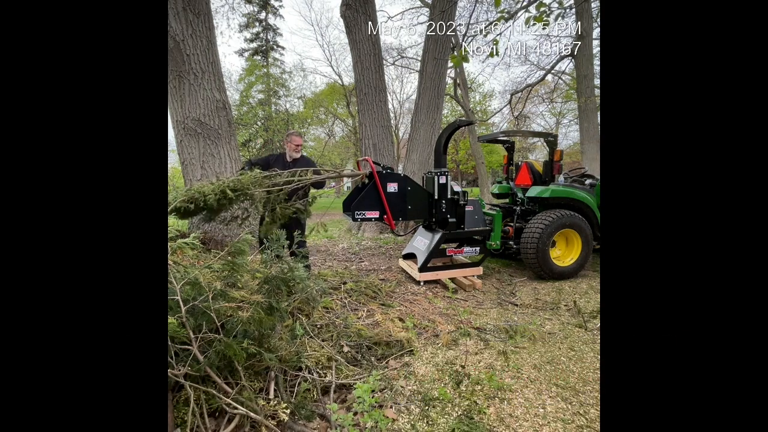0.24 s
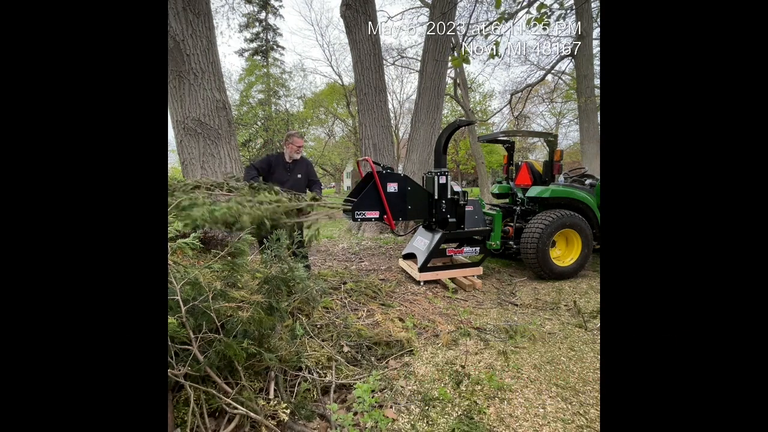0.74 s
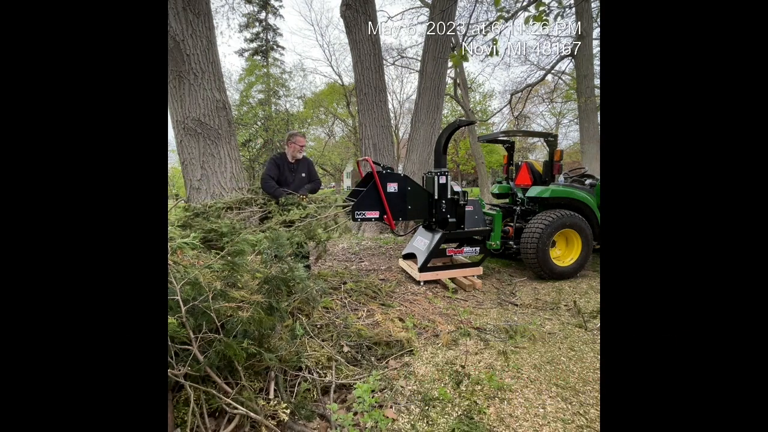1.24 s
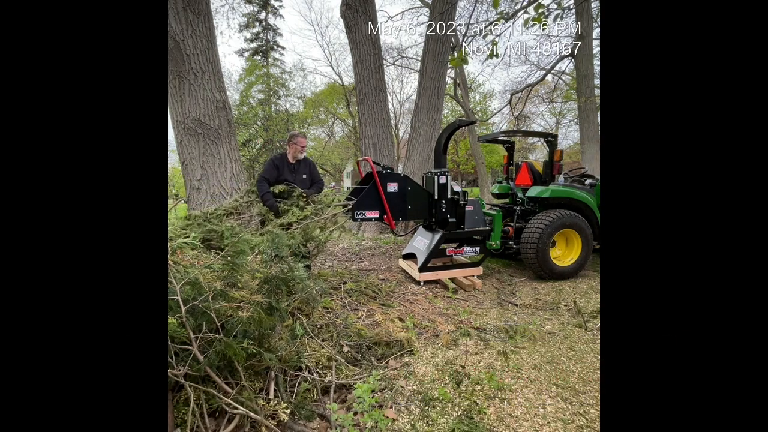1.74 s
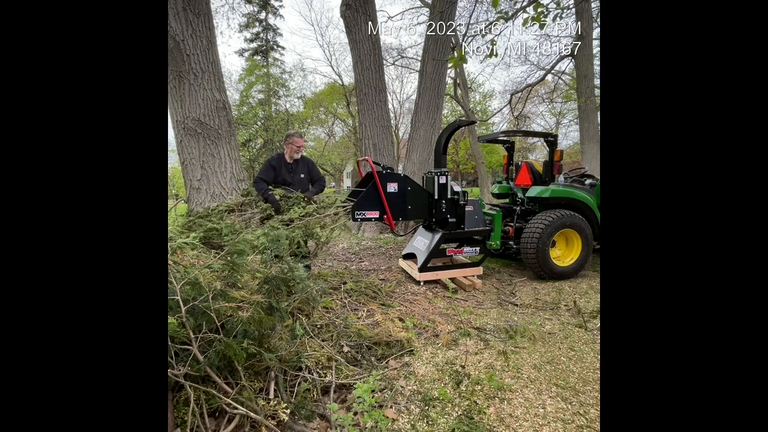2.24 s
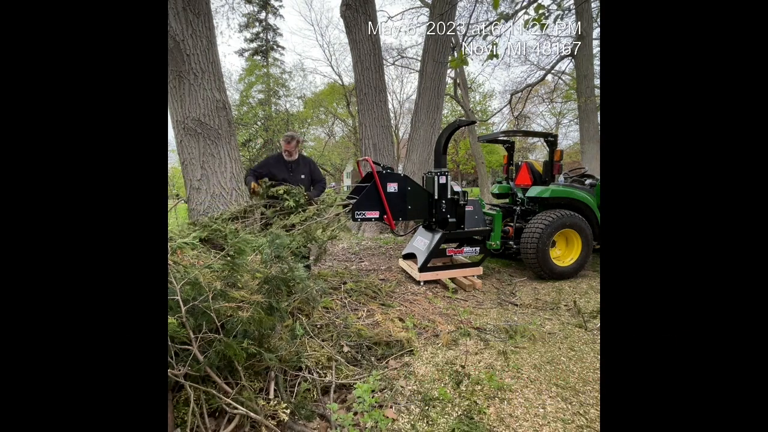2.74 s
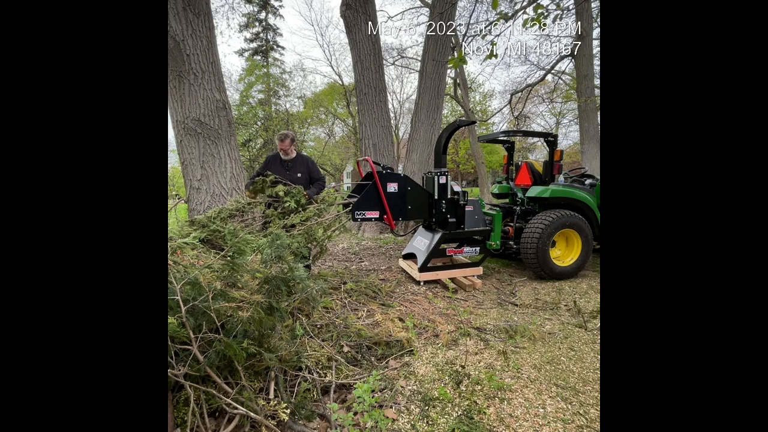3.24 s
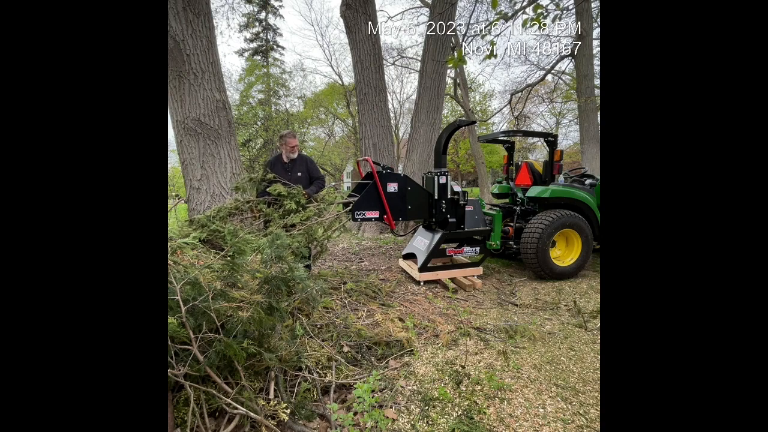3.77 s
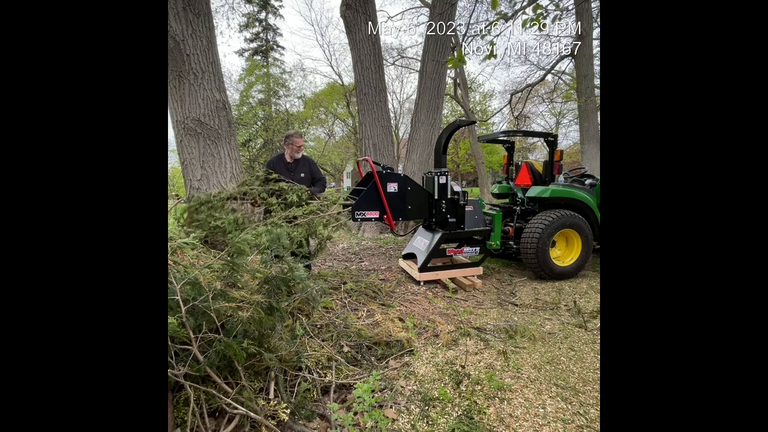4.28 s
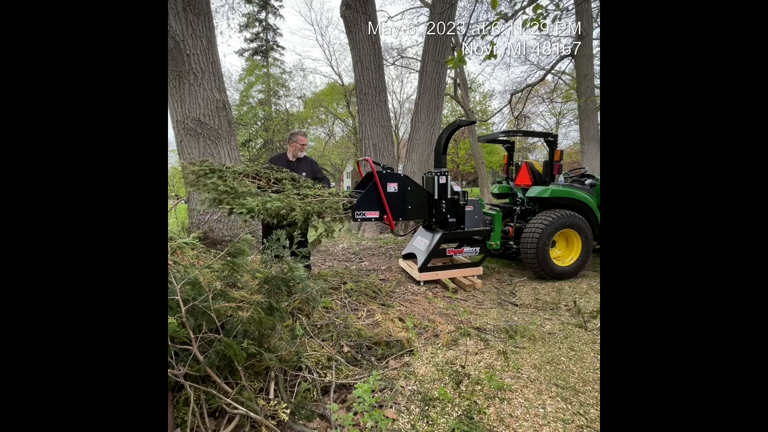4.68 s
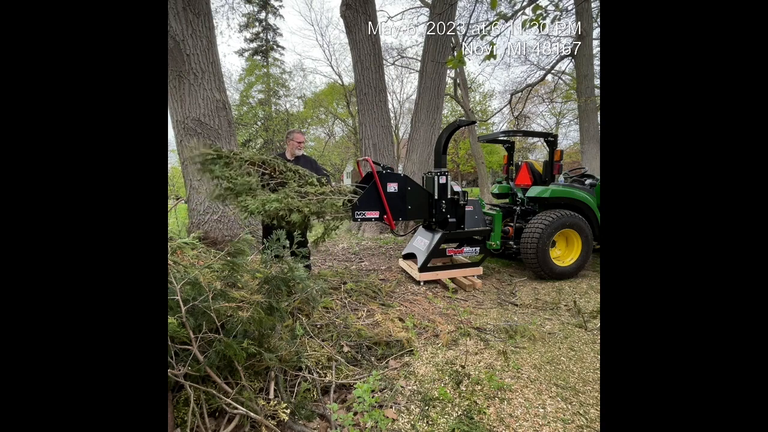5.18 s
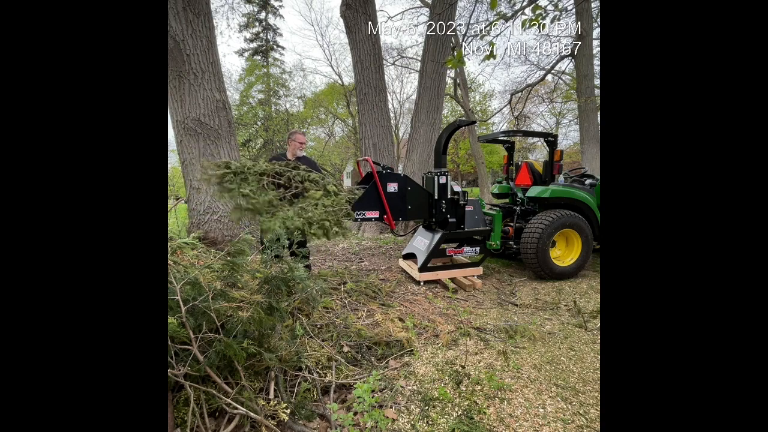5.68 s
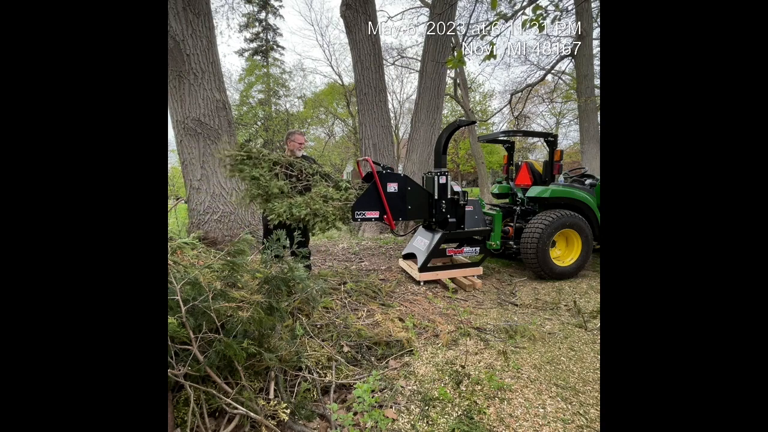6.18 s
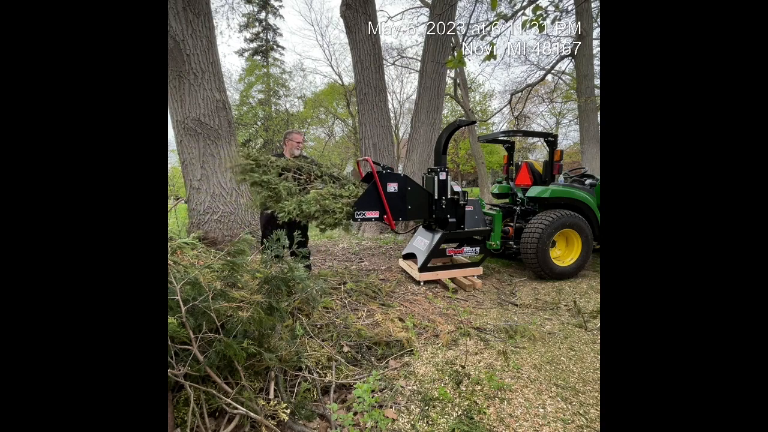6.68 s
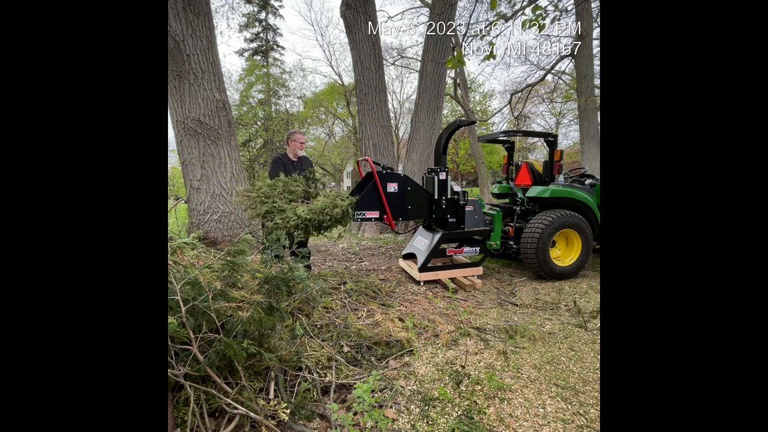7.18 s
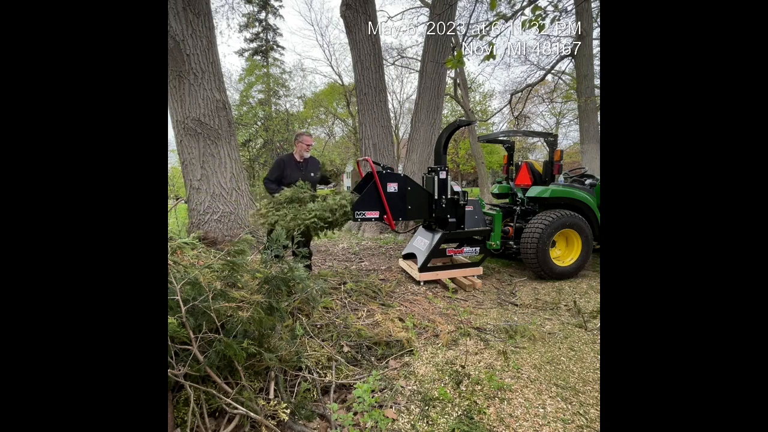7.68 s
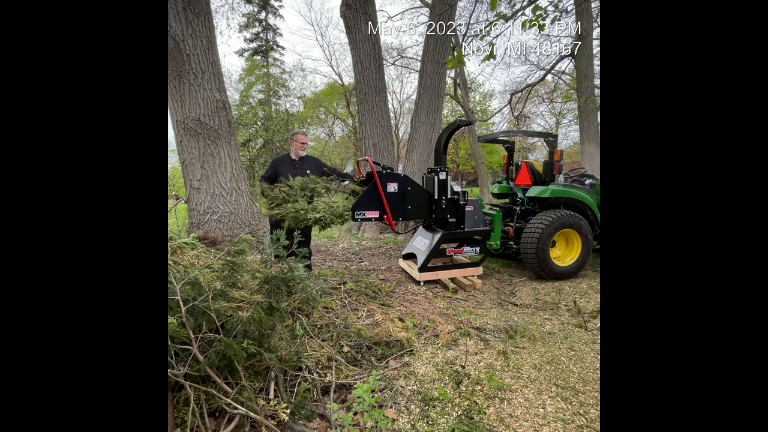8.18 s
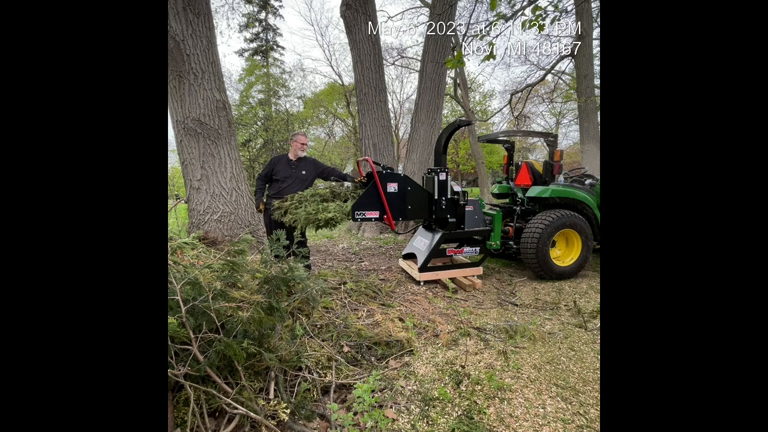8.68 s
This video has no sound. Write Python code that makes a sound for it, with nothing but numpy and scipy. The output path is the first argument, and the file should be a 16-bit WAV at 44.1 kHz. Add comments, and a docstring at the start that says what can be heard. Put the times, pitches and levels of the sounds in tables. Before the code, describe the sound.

A diesel tractor throbs and knocks under the hum and rush of a wood chipper's fan. The thin end of a branch rattles through with small snaps and fades out. The machine runs empty for several seconds, slowly growing louder, until fresh branches go in with loud, rapid chopping, ringing steel and hissing shreds. One fixed microphone stands nearby, outdoors among trees.

```python
"""Among trees, one fixed microphone, near enough to a disc wood chipper to hear single sticks snap.
A three-cylinder diesel tractor drives it, throbbing and knocking under the hum and rush of the fan.
The tail of one branch is chewed up, the machine runs empty, then a new armful goes in and the speed sags.
The knives bite once a turn: the housing thumps and sings, chips and shreds fly, the steel chute rings.
Ground and trunks send back faint echoes of the cutting."""
import sys
import numpy as np
from scipy import signal
from scipy.fft import rfft, irfft
from scipy.io import wavfile

SR = 44100
rng = np.random.default_rng(int(sys.argv[2]) if len(sys.argv) > 2 else 0)


def file_out(sig):
    """Save sig as 16-bit WAV at sys.argv[1]."""
    # one column per channel
    cols = np.atleast_2d(sig).T
    # limit, then scale
    lim = np.clip(cols, -1, 1)
    pcm = np.round(lim * 32767).astype(np.int16)
    wavfile.write(sys.argv[1], SR, pcm)


N = 393372
TIME = np.arange(N) / SR

# Levels in the tables are relative; spectra give level per hertz.
# chipper disc, slowing under the new armful: time_s, turns_per_s
DISC_SPEED = [(0, 40.05), (2, 40.065), (7.42, 40.065), (7.58, 39.65), (8.05, 39.33), (8.5, 39.45),
              (8.92, 39.4)]
# loudness of the drone as heard; it creeps up, then dips when the loud cutting starts: time_s, level_db
DRONE_LEVEL = [(0, -6.5), (2, -3), (7.48, 2.5), (7.56, -2.5), (7.98, 2.5), (8.1, 0), (8.92, -4.5)]
# exhaust and gear tones, firing tone first: multiple_of_cycle_rate, level_db
ENGINE_TONES = [(3, -37.5), (4, -66), (5, -53.5), (6, -37.5), (7, -47.5), (11, -51.5), (21, -54), (27, -70),
                (28, -55), (33, -42), (34, -50), (35, -49), (36, -51.5), (52, -54.5), (61, -55.5),
                (66, -54), (76, -47), (81, -63), (82, -52), (87, -48.5)]
# diesel knock: pitch_hz, level_db
KNOCK_SPECTRUM = [(150, -8.5), (400, -3.5), (750, 0.5), (1000, -6.5), (1350, -7), (1620, -2.5),
                  (2000, -5.5), (2700, -7), (3600, -18), (8000, -25.5), (15000, -36)]
# hum of the disc and its three fan paddles: multiple_of_disc_speed, level_db
FAN_TONES = [(2, -55), (3, -32), (4, -44.5), (5, -41), (6, -33), (7, -44.5), (8, -36.5), (9, -42.5),
             (10, -37.5), (12, -42.5), (13, -48.5), (14, -45), (16, -66), (18, -63), (20, -44.5),
             (22, -47.5)]
# air through fan and chute: pitch_hz, level_db
AIR_SPECTRUM = [(20, -33), (45, -16), (70, -0.5), (140, -0.5), (350, -1), (470, -3), (580, 1), (830, -7),
                (1100, -8), (2700, -9.5), (3900, -23), (8400, -23), (9700, -34.5), (15500, -37)]
# load on the knives, set by the thickness of the wood in the throat: time_s, load_db
OLD_BRANCH_LOAD = [(0.0, -36.5), (0.19, -41.5), (0.778, -46), (0.802, -52), (0.922, -50), (0.93, -51),
                   (1.242, -52.5), (1.6, -56.5)]
NEW_BRANCH_LOAD = [(7.43, -30), (7.462, -25), (7.648, -22), (7.972, -27), (7.986, -29), (8.136, -30.5),
                   (8.143, -30), (8.354, -31), (8.596, -28.5), (8.874, -27), (8.92, -30)]
# hopper and housing under the knife: pitch_hz, level_db
CHOP_SPECTRUM = [(30, -66), (100, -44), (190, -17.5), (330, -11), (395, -4.5), (480, -8), (680, -9.5),
                 (880, -7), (1020, 0), (1150, -3), (1400, -3), (1700, -8), (2400, -22), (5000, -54)]
# chips hitting the chute: pitch_hz, level_db
CHIP_SPECTRUM = [(500, -38), (1400, -10), (1850, 4.5), (2200, 5.5), (2650, 4.5), (3100, -13), (4200, -6.5),
                 (9000, -39)]
# fine shreds and needles: pitch_hz, level_db
SHRED_SPECTRUM = [(1500, -14), (3300, 0.5), (4200, -6.5), (5200, 1), (7200, 1), (8500, 0), (9800, -14.5),
                  (11300, -15.5), (12800, -10.5), (15500, -20.5)]
# the wood runs thin and less is thrown out: start_s, length_s, level_db
THROW_LULLS = [(8.1, 0.039, -1), (8.165, .022, -5), (8.335, 0.16, -0.5), (8.5, 0.14, -1),
               (8.765, 0.11, -0.5)]
# the housing singing: multiple_of_disc_speed, old_branch_db, new_branch_db
HOUSING_TONES = [(10, -48, -0.5), (13, -32, -18), (16, -21, -15), (18, -15, -16), (19, -25, -14),
                 (20, -16, -6.5), (22, -15, -4.5), (24, -20, -19), (25, -7, -4), (26.2, -13, -2.5),
                 (27, -6, -23), (28, -25, -14), (29, -19, -7), (30, -28, -17), (31, -3, -13.5),
                 (33, -5, -13), (34, -29, -9.5), (38, -19, -11), (45, -23, -10)]
# the frame shuddering: multiple_of_disc_speed, old_branch_db, new_branch_db
FRAME_TONES = [(3, -70, -42.5), (4, -74, -51.5), (5, -66, -46), (7, -70, -50), (8, -35, -43.5),
               (9, -47, -45), (10, -83, -62), (11, -72, -41.5), (12, -79, -44), (13, -78, -50)]
# sheet steel of the chute: pitch_hz, width_hz, old_branch_db, new_branch_db
CHUTE_MODES = [(1790, 70, 1, 1), (2270, 41, -8, -8), (2410, 19, -5, -19), (2490, 30, -10, -14),
               (2693, 45, -17, -2), (2707, 41, -16, -8)]
# volleys of coarse chips that ring the chute harder: start_s, length_s, boost_db
CHIP_VOLLEYS = [(0.093, 0.088, 5.5), (0.41, 0.075, 10), (0.56, 0.1, 5), (0.984, .16, 6.5), (8.086, .032, 8),
                (8.135, 0.2, 13)]
# single sticks snapping at the knife: start_s, level_db
STICK_SNAPS = [(.074, -37), (.171, -41), (.197, -33), (.27, -36), (.297, -34), (.328, -34), (.372, -34),
               (.422, -37), (.471, -33.5), (.497, -41), (.571, -34), (.671, -40), (.697, -36), (.755, -30),
               (.778, -39), (.797, -40), (.947, -48), (1.259, -31.5), (1.27, -39), (1.283, -55),
               (1.303, -46), (1.344, -40), (1.42, -48), (1.55, -44), (7.407, -30.5), (7.434, -25),
               (7.484, -25), (7.534, -29), (7.812, -25), (7.865, -24), (8.016, -22), (8.043, -24),
               (8.143, -28), (8.192, -21), (8.22, -29), (8.242, -22.5), (8.268, -31), (8.294, -22),
               (8.446, -25), (8.623, -29), (8.649, -29), (8.674, -33), (8.7, -28), (8.727, -28)]
# splinters of a snapping stick: pitch_hz, level_db
SNAP_SPECTRUM = [(200, -8), (1200, 1), (2400, 7), (3200, 8), (4200, 2.5), (5500, 7.5), (8500, 5.5),
                 (9900, -11.5), (15500, -10)]
# how hard the new wood binds against the disc: time_s, level_db
WOOD_BINDING = [(7.41, 1), (7.47, 9), (7.56, 1), (7.75, 0.5), (7.82, 6.5), (7.96, -0.5), (8.01, -21),
                (8.2, -2.5), (8.38, -5.5), (8.58, 0.5), (8.74, -9), (8.88, -18)]
# thick stems under the knife: start_s, length_s, level_db, low_hz, high_hz, high_over_low_db
STEM_KNOCKS = [(7.425, 0.026, -25.5, 1130, 2260, 0), (7.46, 0.098, -21.5, 1260, 1900, 0.5),
               (7.559, 0.072, -24, 1100, 2080, 5), (7.632, 0.14, -28, 1080, 2170, 4),
               (7.803, 0.163, -32, 1120, 1850, -1), (8.473, 0.25, -32, 1140, 1800, -20),
               (8.745, 0.16, -34, 1230, 1900, 4)]

OLD, NEW = 0, 1  # picks a branch's level column
RUN_OUT_S, RUN_OUT_FADE_S = 1.764, 0.25  # the old branch is gone, after thinning for this long
BITE_S = 7.407  # a knife meets the new branch
CYCLES_PER_TURN, ENGINE_LEAD_CYCLES = .51866, .071  # engine against disc; its lead at the bite
BELT_SLIP = .0036  # share of speed that the belt loses after the bite
KNIFE_LAG_TURNS, KNIFE_RISE_TURNS = .05, .025  # when the knife lands, how fast its blow builds
USUAL_LOAD_DB = -30
CHIP_SLOPE, RING_SLOPE, SHUDDER_SLOPE = 0.55, 0.34, 0.62  # dB gained per dB of load
SURGE_PEAK_S, SURGE_PERIOD_S = .2, .385  # the feed pulls the wood in by surges
SHRED_BUILD_S = 0.042  # shreds take a moment to fill the chute
TREBLE_LIMIT_HZ = 15750


def amp(db):
    """Decibels to gain."""
    return 10 ** (np.asarray(db) / 20)


def unit(x):
    """Scales to rms 1."""
    return x / np.sqrt(np.mean(x ** 2) + 1e-20)


def curve(rows):
    """Joins rows of (time_s, value) by straight lines."""
    return np.interp(TIME, *np.transpose(rows))


def ramp(start_s, length_s):
    """Goes from zero to one over the given time."""
    return np.clip((TIME - start_s) / length_s, 0, 1)


def spells(rows, edge_s):
    """Level in dB from rows of (start_s, length_s, level_db), with short edges."""
    return sum(db * (ramp(s, edge_s) - ramp(s + length, edge_s)) for s, length, db in rows)


def drift(hz):
    """A random wander of rms 1, up to about the given rate."""
    rolloff = 1 + (np.fft.rfftfreq(N, 1 / SR) / hz) ** 4
    return unit(irfft(rfft(rng.standard_normal(N)) / rolloff, N))


def colour(x, spectrum, size=4096):
    """Minimum-phase filter of unit energy with the given spectrum."""
    hz, db = np.transpose(spectrum)
    log_hz = np.log(abs(np.fft.fftfreq(size, 1 / SR)) + 1)
    log_gain = np.log(amp(np.interp(log_hz, np.log(hz), db)))
    taps = np.fft.ifft(np.exp(np.conj(signal.hilbert(log_gain)))).real[:size // 2]
    return signal.oaconvolve(x, taps / np.linalg.norm(taps))[:N]


def resonate(x, hz, width_hz):
    """A broad resonance with steep skirts, rms 1."""
    band = signal.butter(2, [hz - width_hz / 2, hz + width_hz / 2], "band", fs=SR, output="sos")
    return unit(signal.sosfilt(band, x))


def rattle(turns, harmonics=90, size=8192):
    """A random rattle that comes back the same at every turn."""
    cycle = irfft(np.r_[0, np.exp(2j * np.pi * rng.random(harmonics))], size)
    return unit(np.interp(turns % 1, np.arange(size) / size, cycle))


def strokes(turns, decay, rest, rise=0.11):
    """A swell at every whole turn that dies towards a resting level; rise and decay are in turns."""
    phase = turns % 1
    tail = np.exp(-phase / decay) / (1 - np.exp(-1 / decay))  # the tails of earlier strokes pile up
    return unit(rest + tail - np.exp(-phase / rise))


def knife_strokes(turns, decay, rest):
    """Sharp strokes timed to the landing of the knife."""
    return strokes(turns - KNIFE_LAG_TURNS, decay, rest, rise=KNIFE_RISE_TURNS)


def bite_sizes(turns, spread_db):
    """A gain for each knife pass, as every bite differs in size."""
    index = np.floor(turns - np.floor(turns[0])).astype(int)
    return amp(spread_db * rng.standard_normal(N // 100))[index]


def grains(per_s, spread_db):
    """Random impacts of unequal size."""
    size = amp(spread_db * np.minimum(rng.exponential(1, N), 4))
    return unit(size * rng.standard_normal(N) * (rng.random(N) < per_s / SR))


def tones(turns, orders, waver_db, smear_rad=.2):
    """Wavering whole harmonics of a shaft; the steel delays high ones more and so smears each pulse."""
    frames = np.arange(0, N, SR // 12)
    out = np.zeros(N)
    for order, db in orders:
        level = np.interp(np.arange(N), frames, amp(db + waver_db * rng.standard_normal(len(frames))))
        phase = 2 * np.pi * round(order) * turns - smear_rad * round(order) ** 2
        out += level * np.cos(phase + .02 * order * rng.standard_normal())
    return out


def tractor(turns):
    """Exhaust and gear tones, and a diesel knock at each of the three firings of a four-stroke cycle."""
    cycles = CYCLES_PER_TURN * (turns + BELT_SLIP * np.maximum(turns, 0)) + ENGINE_LEAD_CYCLES
    knock = unit(rattle(cycles, harmonics=300) + 1.52 * rng.standard_normal(N))
    knock *= strokes(3 * cycles, decay=0.23, rest=0.7)
    firing = tones(cycles, ENGINE_TONES[:1], waver_db=0.5, smear_rad=.133)
    firing *= amp(-6 * ramp(start_s=7.3, length_s=.3))  # the deepest tone fades as loud cutting begins
    overtones = tones(cycles, ENGINE_TONES[1:], waver_db=1.5, smear_rad=.133)
    return firing + overtones + amp(-42.5) * colour(knock, KNOCK_SPECTRUM)


def fan(turns):
    """Three paddles on the disc hum and chop the air."""
    air = rng.standard_normal(N) * strokes(3 * turns, decay=0.93, rest=1.0) * amp(drift(hz=37))
    hum = tones(turns, FAN_TONES, waver_db=0.5)
    hum *= amp(-8 * ramp(BITE_S, length_s=0.27))  # heard more faintly during the loud cutting
    return hum + amp(-37.5) * colour(air, AIR_SPECTRUM)


def cutting(turns, load_db, chop_db, chip_db, shred_db, shred_slope, shred_fill, chop_decay, rest):
    """Each knife pass thumps the housing much like the last and throws a burst of chips and shreds."""
    blend = 1.356 * TIME  # the cut changes slowly as the branch feeds in
    cut = np.cos(blend) * rattle(turns) + np.sin(blend) * rattle(turns)
    chop = unit(colour(.5 * cut + .6 * grains(per_s=6000, spread_db=4.1), CHOP_SPECTRUM))
    chop *= strokes(turns - .1, decay=chop_decay, rest=0.46)
    chips = unit(colour(.5 * cut + grains(per_s=7000, spread_db=1.1), CHIP_SPECTRUM))
    chips *= knife_strokes(turns, decay=0.91, rest=rest)
    spray = grains(per_s=10000, spread_db=1.0) * knife_strokes(turns, decay=0.87, rest=rest)
    shreds = colour(spray, SHRED_SPECTRUM)
    surge = np.cos(2 * np.pi * (TIME - SURGE_PEAK_S) / SURGE_PERIOD_S)
    chips *= amp(chip_db + CHIP_SLOPE * load_db + 0.2 * surge) * bite_sizes(turns, spread_db=2.5)
    shreds *= amp(shred_db + shred_slope * load_db + 1.65 * surge) * bite_sizes(turns, spread_db=1.0)
    thrown = (chips + shred_fill * shreds) * amp(spells(THROW_LULLS, edge_s=.005))
    return amp(chop_db + load_db) * chop + thrown


def housing(turns, branch):
    """The housing sings, unevenly, as wood binds against the disc."""
    orders = [(order, db[branch]) for order, *db in HOUSING_TONES]
    song = tones(turns, orders, waver_db=3.5, smear_rad=.134)
    return song * strokes(turns - .1, decay=1.0, rest=0.88)


def frame(turns, branch):
    """The loaded frame shudders at low multiples of the disc speed."""
    return tones(turns, [(order, db[branch]) for order, *db in FRAME_TONES], waver_db=3.5)


def chute(turns, branch):
    """Coarse chips, thrown once a turn, set the steel chute ringing, most of all in a volley."""
    t = TIME[:SR // 10]
    ring = sum(amp(db[branch]) * np.exp(-np.pi * width_hz * t) * np.sin(2 * np.pi * hz * t)
               for hz, width_hz, *db in CHUTE_MODES)
    blows = grains(per_s=8300, spread_db=1) + 0.36 * rattle(turns)
    blows *= strokes(turns, decay=0.13, rest=0.038)
    return unit(signal.oaconvolve(blows, ring)[:N]) * amp(spells(CHIP_VOLLEYS, edge_s=0.0072))


def steelwork(turns, load_db, bind_db, branch, song_db, shudder_db, ring_db):
    """The housing follows the binding and the size of each bite; frame and chute follow the load."""
    song = amp(song_db + bind_db) * housing(turns, branch)
    shudder = amp(shudder_db + SHUDDER_SLOPE * load_db) * frame(turns, branch)
    song *= bite_sizes(turns, spread_db=2.0)
    ring = amp(ring_db + RING_SLOPE * load_db) * chute(turns, branch)
    return song + shudder + ring


def trees(x, echo_db, count=14):
    """The ground and the trunks send a few faint echoes back to the microphone."""
    delays_s = rng.uniform(0.0037, .07, count)
    echoes = sum(rng.choice([-1, 1]) * np.exp(-s / 0.09) * np.pad(x, (int(s * SR), 0))[:N]
                 for s in delays_s)
    return x + amp(echo_db) * echoes


def old_branch(turns):
    """The thin end of a branch tapers to twigs and runs out."""
    load_db = curve(OLD_BRANCH_LOAD) - USUAL_LOAD_DB
    feeding = 1 - ramp(RUN_OUT_S - RUN_OUT_FADE_S, RUN_OUT_FADE_S)
    wood = cutting(turns, load_db, chop_db=-28.0, chip_db=-36.0, shred_db=-31.0,
                   shred_slope=0.57, shred_fill=1, chop_decay=0.95, rest=1.0)
    steel = steelwork(turns, load_db, load_db, OLD, song_db=-30.0, shudder_db=-3.0, ring_db=-43.5)
    return trees(feeding * wood, echo_db=-19) + feeding * steel


def snaps(decay_s):
    """Each stick breaks in a short shower of splinters."""
    level = sum(amp(db) * (TIME >= s) * np.exp(-abs(TIME - s) / decay_s) for s, db in STICK_SNAPS)
    splinters = grains(per_s=12000, spread_db=1.0)
    return colour(level * splinters, SNAP_SPECTRUM)


def new_branch(turns):
    """A fresh armful goes in butt first; its needles keep up a spray almost whatever the load."""
    load_db = curve(NEW_BRANCH_LOAD) - USUAL_LOAD_DB
    bind_db = curve(WOOD_BINDING)
    feeding = ramp(BITE_S, length_s=0.0011)
    filled = 1 - np.exp(-np.maximum(TIME - BITE_S, 0) / SHRED_BUILD_S)
    wood = cutting(turns, load_db, chop_db=-32.5, chip_db=-31.5, shred_db=-28.0,
                   shred_slope=0.031, shred_fill=filled, chop_decay=0.39, rest=0.51)
    steel = steelwork(turns, load_db, bind_db, NEW, song_db=-33.5, shudder_db=-0.5, ring_db=-42.0)
    return trees(feeding * wood, echo_db=-20) + feeding * steel


def stems(turns, edge_s=.004):
    """Each thick stem knocks once a turn, at its own two resonances, until it is eaten."""
    blows = rattle(turns) + .7 * grains(per_s=7000, spread_db=1.5)
    blows *= knife_strokes(turns, decay=.3, rest=0.17)
    out = np.zeros(N)
    for start_s, length_s, db, low_hz, high_hz, high_db in STEM_KNOCKS:
        low = resonate(blows, low_hz, width_hz=330)
        high = amp(high_db) * resonate(blows, high_hz, width_hz=700)
        under_knife = ramp(start_s, edge_s) - ramp(start_s + length_s, edge_s)
        out += amp(db) * unit(low + high) * under_knife
    return out


def scene():
    """Engine, fan and knives keep time with one shaft and reach the microphone in mono."""
    turns_per_s = curve(DISC_SPEED) * (1 + 0.00037 * drift(hz=4.3))
    turns = np.cumsum(turns_per_s) / SR
    turns -= np.interp(BITE_S, TIME, turns)  # turns count from the bite
    wood = old_branch(turns) + new_branch(turns) + stems(turns) + snaps(decay_s=0.018)
    drone = amp(curve(DRONE_LEVEL)) * (tractor(turns) + fan(turns))
    return (drone + wood)[None]


def record(dry):
    """The loudest peaks are rounded off, then the highest treble is cut."""
    rounded = dry / (1 + (dry / .5) ** 4) ** (1 / 4)
    lowpass = signal.firwin(511, TREBLE_LIMIT_HZ, window=("kaiser", 9), fs=SR)
    return signal.oaconvolve(rounded, lowpass[None], "same")


dry = scene()
out = record(dry)
file_out(out)
```